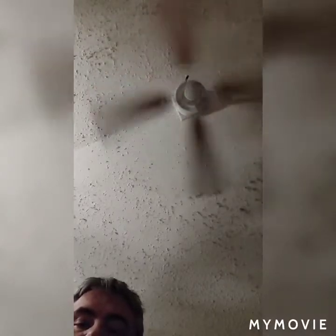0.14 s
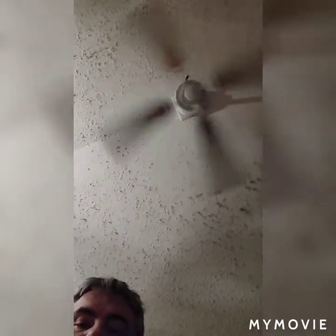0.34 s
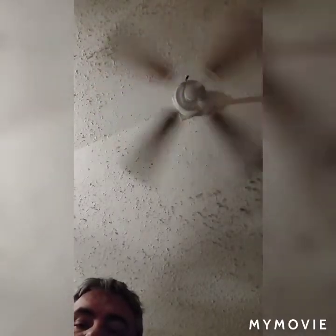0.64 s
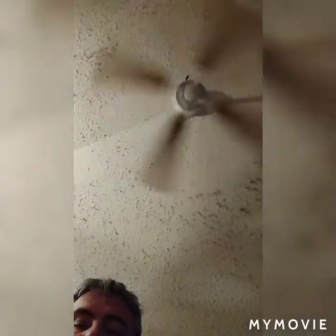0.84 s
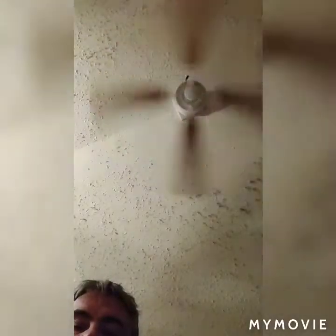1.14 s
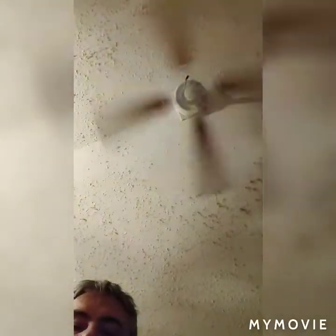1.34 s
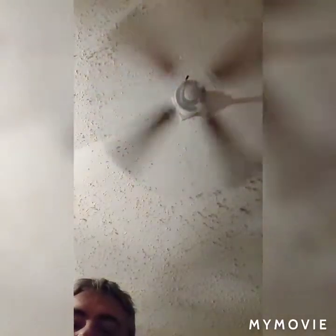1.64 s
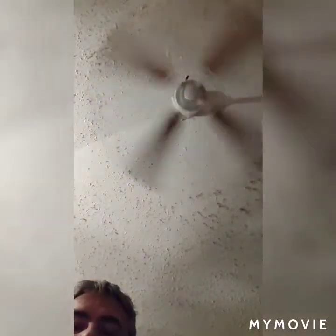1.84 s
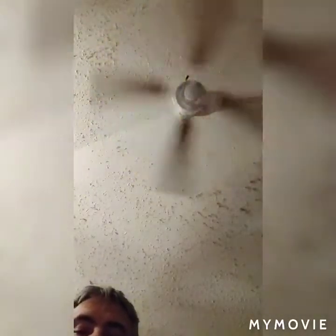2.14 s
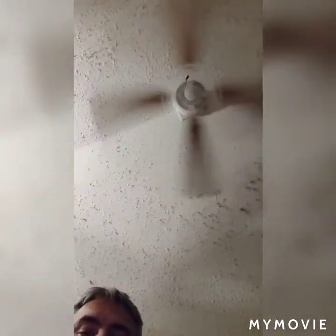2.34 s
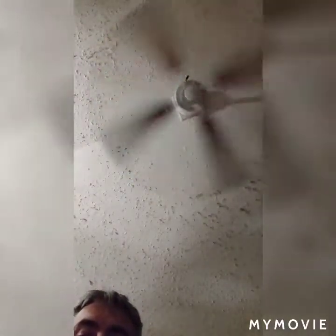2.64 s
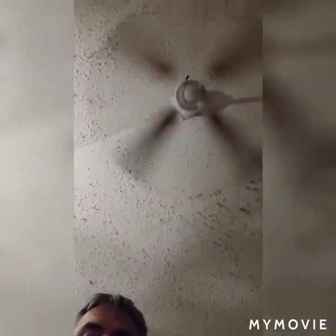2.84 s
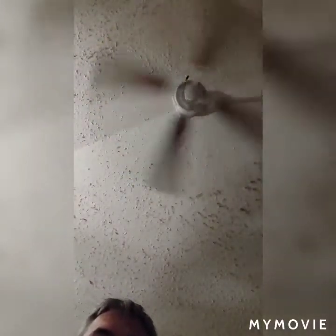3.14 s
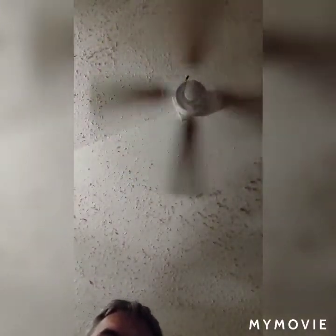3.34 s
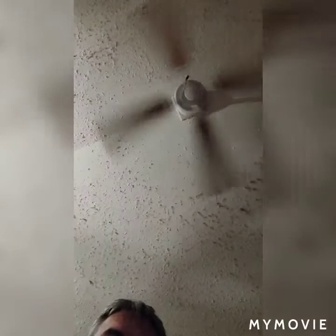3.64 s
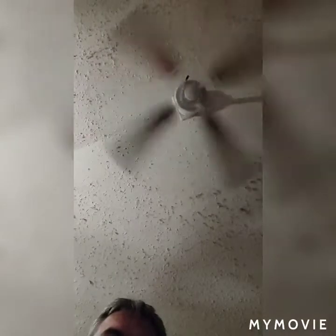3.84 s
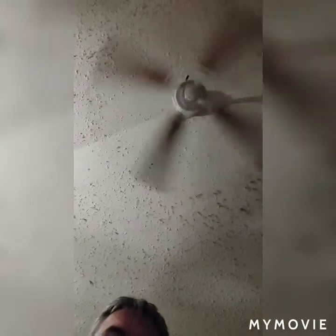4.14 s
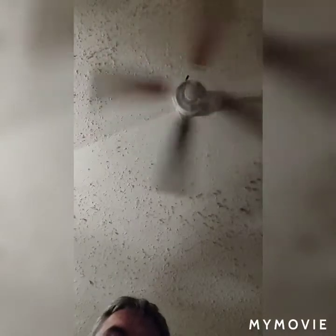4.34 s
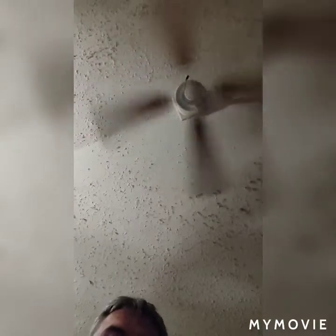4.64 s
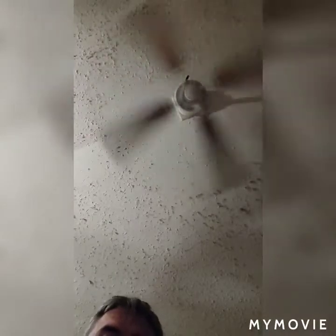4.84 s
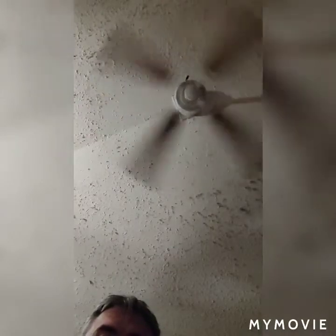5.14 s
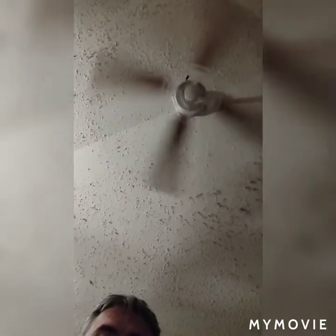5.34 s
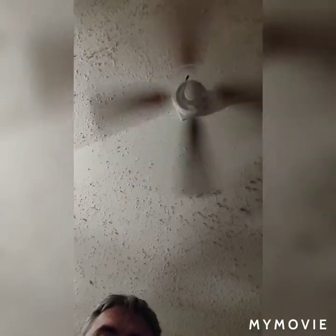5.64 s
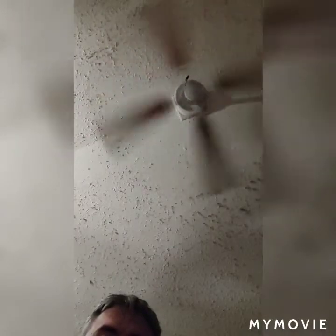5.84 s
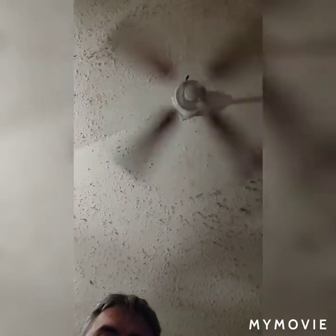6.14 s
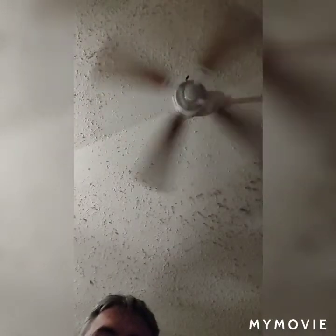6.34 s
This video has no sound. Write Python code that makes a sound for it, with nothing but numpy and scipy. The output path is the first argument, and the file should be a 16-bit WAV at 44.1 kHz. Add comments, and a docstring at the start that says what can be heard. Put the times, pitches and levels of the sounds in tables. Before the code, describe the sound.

Close, dry crinkling of a crisp plastic pack being squeezed and torn by hand. Sharp clicks with tiny short rings mix with finer clumped crackle, doubled by a hard surface nearby. A few damped thumps and buzzes come from a table, strongest near two seconds. The first half is patchy, the second nearly continuous and brighter. Small indoor room, faint fan air far below.

```python
"""Stiff clear plastic packaging is squeezed and torn by hand close to a microphone in a small room.
Snaps are gritty noise bursts with a short ring; between them smaller folds crackle as clumped noise puffs.
A hard surface nearby returns both a few milliseconds later. Now and then the pack knocks on a table:
a damped low swing with rattle and buzz. A fan murmur of shaped noise lies far below."""
import sys
import numpy as np
from scipy import signal
from scipy.fft import rfft, irfft
from scipy.io import wavfile
from scipy.ndimage import uniform_filter1d

SR = 44100
rng = np.random.default_rng(int(sys.argv[2]) if len(sys.argv) > 2 else 0)


def inscribe(sig):
    """Save sig as 16-bit PCM at rate SR to the path in sys.argv[1].

    A 1-D sig is mono; a 2-D sig holds one channel per row.
    Samples are clipped to [-1, 1] before scaling.
    """
    pcm = np.round(np.clip(np.atleast_2d(sig).T, -1, 1) * 32767)
    wavfile.write(sys.argv[1], SR, pcm.astype(np.int16))


def volts_from_db(level):
    """Convert decibel levels to linear amplitude ratios."""
    exponent = np.asarray(level, float) / 20
    return 10 ** exponent


N = 285768

# loud creases: (time [s], level [dB], brightness [dB/octave], ring [Hz], relative ring level [dB])
CREASES = [(0.0257, -22, 4, 2436, -2), (0.052, -26, 15, 4430, 7.5), (0.132, -33, 4.5, 3060, 0),
           (0.1666, -25.5, 2, 4260, -22), (0.2123, -12.5, 5.5, 786, -22), (0.233, -30, 2, 1530, -15),
           (0.2513, -29.5, 0, 5900, -5), (0.2575, -22.5, 1.0, 6190, 8.5), (0.276, -45.5, 7, 1210, 15),
           (0.3342, -21, 3, 1050, -7), (0.3605, -19.5, 2, 2310, -4), (0.377, -33, -1, 2760, 7),
           (0.415, -37, -3, 2700, 6), (0.4469, -31, 2.5, 4280, -20), (0.5446, -33.5, 1.5, 1427, 8),
           (0.6321, -33, 4.5, 2610, 10), (0.652, -37.5, 6, 2750, -13), (0.6676, -36.5, -1.5, 2580, 6.5),
           (0.703, -42.5, -2, 1420, 8), (0.719, -32, 3.5, 1500, 3), (0.74, -34, 0, 1810, 4),
           (0.78, -38.5, -5, 1556, 2), (0.878, -33, 1, 3480, -8), (0.9019, -24, 0.5, 1060, -16),
           (0.942, -27, -1, 5740, 8), (1.043, -27.5, 5, 1500, -16), (1.0564, -29.5, 5, 1500, 4.5),
           (1.1106, -19, 22, 3040, -3.5), (1.117, -21, 4.5, 2630, -16), (1.1414, -22.5, 1, 2434, 1),
           (1.2609, -25.5, -1, 1620, -5), (1.2651, -16, 5.5, 1610, -6), (1.301, -30, 5, 2130, -5),
           (1.3262, -38, 3.5, 1000, -6), (1.3738, -28.5, 6.5, 3700, -22), (1.4345, -40.5, 14.5, 3600, -19),
           (1.523, -37, -0.5, 1290, -1.5), (1.625, -64, -9, 1050, 14), (1.656, -48.5, 7, 2500, 0),
           (1.688, -33.5, 4.5, 3510, 8), (1.6947, -28, 3, 4175, 9.5), (1.7133, -24, 2.5, 4300, 4),
           (1.768, -53.5, -1, 2830, 20), (1.7888, -27.5, 2.5, 1080, -7), (1.806, -35, 5, 1520, -4),
           (1.992, -39, -8, 1090, 1), (2.0036, -32, -3.5, 1090, 3), (2.0158, -32, 0.5, 2610, 9),
           (2.065, -31.5, -11, 2560, 3.5), (2.08, -27, -14, 1310, -22), (2.0929, -36.5, -1.5, 3870, -3),
           (2.122, -27.5, -2.5, 2450, -2), (2.165, -12.5, 3.5, 2490, 5), (2.356, -55, -7, 2760, 16.5),
           (2.37, -33.5, 1, 1885, 6.5), (2.439, -44.5, 2.5, 1680, 5), (2.6112, -44, -5, 2490, 15),
           (2.6483, -27, 2.5, 2710, 0), (2.6694, -23, 5.5, 1900, -6), (2.6946, -47, 5, 2680, 14),
           (2.725, -32, 3.5, 4300, -11), (2.7398, -40, 2.5, 3910, 11), (2.9375, -53, 1, 2780, 21),
           (2.9603, -34, 6, 1950, 6.5), (2.9807, -31.5, 3.5, 2700, 10), (3.005, -27, 5, 2530, -11),
           (3.037, -28.5, 7.5, 2570, 0), (3.0745, -18, 4, 1080, -13), (3.0996, -21.5, 6, 2460, -1.5),
           (3.1811, -42, 6, 1130, 7.5), (3.208, -36, 0, 3570, -1), (3.2142, -41, -8, 1110, 7),
           (3.2301, -34.5, -8, 2670, -24), (3.2581, -32, 0, 840, -1.5), (3.2856, -30.5, 5, 5600, -7),
           (3.301, -35, 2.5, 850, 1), (3.352, -41, -14, 1030, 4), (3.369, -28, 2, 1700, 2),
           (3.3908, -23, 8, 1240, -6), (3.449, -16, 4, 4724, 1.5), (3.476, -41.5, 8, 900, 3.5),
           (3.5605, -30, 2.5, 2640, -4), (3.578, -34, 5, 2850, 6), (3.6125, -38, 0, 2950, 9),
           (3.656, -23, 4, 2437, 2.5), (3.697, -27, 3, 5970, -10), (3.733, -38.5, -5, 5840, 9),
           (3.749, -34.5, 10, 920, -1), (3.777, -24.5, 12, 1100, -10), (3.798, -25.5, -5.5, 1060, -11.5),
           (3.815, -20, 4.5, 6200, -12), (3.831, -34.5, -1, 2730, -3), (3.8602, -22.5, 15, 6050, 0),
           (3.886, -24.5, 6, 5260, 3), (3.936, -24, 5, 5930, -8), (3.9723, -20.5, 10.5, 1080, -11),
           (3.98, -29.5, -5.5, 1080, 5), (3.9942, -22, 5.5, 814, -9.5), (4.011, -28, 10.5, 6100, -13),
           (4.0719, -28.5, 2, 3550, -7), (4.0889, -40, 2, 1630, 8.5), (4.1552, -35.5, 7, 5970, -7),
           (4.175, -35, 3.5, 3020, -6), (4.181, -30, 5.5, 3700, 5.5), (4.2175, -36, 2.5, 1790, 1),
           (4.2381, -49.5, -3, 1080, 12), (4.2657, -28.5, 4, 830, -7), (4.2864, -28.5, 3.5, 3830, -5),
           (4.3125, -26.5, 5, 850, -10), (4.43, -37, 10, 6200, 2), (4.4571, -30, 3, 2980, 4),
           (4.466, -38, 7, 3470, 10), (4.543, -41, 4, 1410, 2), (4.585, -28, 5, 3230, 5),
           (4.623, -33, -3, 2800, 5.5), (4.641, -28, 1.5, 3110, -1), (4.688, -27, 0.5, 5900, -5),
           (4.697, -22.5, 20, 5610, 5.5), (4.731, -22.5, 2, 4320, -3), (4.753, -30, 9, 3770, 7),
           (4.7783, -18, 0.7, 2760, -4), (4.812, -26, 5, 3850, 4.5), (4.8416, -36.5, 0, 3950, 7),
           (4.8616, -25.5, 5.5, 3850, -1), (4.883, -28, 3, 2820, -15), (4.9027, -26, 4, 2790, 0),
           (4.9392, -25.5, 4, 2710, -4), (4.972, -28, 2.5, 1040, -4.5), (4.9924, -27.5, 6, 1180, -10.5),
           (5.026, -24.5, 7.5, 950, -11), (5.1038, -22.5, 3, 4480, 3), (5.117, -26.5, 6, 3870, -11),
           (5.1934, -26.5, 4, 4140, 1), (5.236, -33.5, -8, 1740, 8), (5.2521, -29, 3.5, 3850, -14),
           (5.2796, -36.5, 2, 1120, 2.5), (5.3008, -22, 6.5, 3920, -4), (5.3345, -22.5, 3, 3870, -4),
           (5.371, -18.5, 8, 3980, 2.5), (5.384, -15, 7.5, 2720, -8), (5.413, -31, -6, 1470, 9),
           (5.4536, -25.5, 0.5, 3280, -6), (5.4875, -20, 3.5, 3900, 6.5), (5.5081, -19, -1.5, 3040, -5),
           (5.5536, -22, 2.5, 4270, -19), (5.617, -33.5, 3, 2940, -1), (5.656, -14.5, 3.5, 3580, 2),
           (5.746, -23.5, 4, 5600, -8), (5.793, -34, 10, 4240, -9), (5.8062, -27.5, 4, 3850, -19),
           (5.8712, -44.5, 0, 4130, -4), (5.926, -43.5, 7, 1180, 3.5), (5.9913, -25.5, 2, 1490, 1),
           (6.009, -24, -1, 2820, -17), (6.021, -38.5, -4, 1070, 4), (6.077, -27.5, 2, 3280, 5),
           (6.103, -43.5, 3, 1320, 6), (6.1461, -25, 0.5, 1514, 3.5), (6.183, -53, -1, 1510, 15),
           (6.213, -20.5, 3, 4170, -14), (6.2534, -20, 2.5, 3780, 3), (6.3587, -19.5, 6.5, 6270, -5),
           (6.396, -28.5, 4.5, 5950, -2), (6.4271, -27, 7.5, 3780, -11), (6.442, -28.5, 2.5, 2940, -8)]
# pack against table: (time [s], peak level [dB], pitch [Hz], t60 [s])
TABLE_KNOCKS = [(0.961, -25, 263, 0.077), (1.262, -23.5, 385, 0.018), (1.5273, -29.5, 175, 0.038),
                (1.5518, -28, 195, 0.03), (1.71, -44, 268, 0.041), (1.966, -42.5, 192, 0.11),
                (2.006, -12, 194, 0.048), (2.06, -34, 233, 0.092), (2.121, -30, 365, 0.079),
                (2.168, -17, 371, 0.1), (2.187, -18, 277.5, 0.099), (2.2, -32.5, 154, 0.15),
                (2.223, -26.5, 332, 0.12), (3.447, -19, 274, 0.0079), (5.512, -25, 384, 0.04),
                (5.656, -13, 454, 0.02), (6.012, -36.5, 643, 0.057), (6.255, -18.5, 378, 0.015)]
# table buzz after a knock: (frequency [Hz], width [Hz], relative level [dB])
TABLE_BUZZ = [(538, 50, 7.5), (815, 260, 5.5), (1370, 60, -4.5), (2593, 40, 0.5), (3490, 60, -4.5),
              (4320, 66, -10.5)]
# resonances of pack and table: (frequency [Hz], width [Hz], gain [dB])
PACK_RESONANCES = [(850, 130, -4.5), (1080, 300, 0), (1450, 410, -7), (2744, 380, -5.5), (3870, 470, -6.5),
                   (9700, 320, -12), (11720, 840, -4)]
# microphone response: (frequency [Hz], gain [dB])
MICROPHONE = [(30, -33), (80, -6.5), (160, -5), (400, -7.5), (1000, -11.5), (2000, -8), (2600, -6.5),
              (6000, -5), (8600, -5.5), (11800, -5), (12800, -15.5), (15800, -18), (16600, -69)]
# spectrum of fan murmur and faint steady hiss: (frequency [Hz], relative density [dB])
AIR_SPECTRUM = [(24, -41.5), (40, -11.5), (137, -12), (269, 4), (402, -6.5), (1760, -28), (4000, -23),
                (5580, -29.5), (11400, -22), (16000, -50.5)]
# hands squeezing the pack: (start [s], length [s], crackle level [dB], relative body of the rustle [dB])
HAND_SQUEEZES = [(0, 0.056, -52.5, -31), (0.127, .07, -56.5, -9), (0.19, 0.051, -55, -8),
                 (0.315, 0.16, -54.5, -18), (0.656, 0.11, -54.5, 0.5), (0.885, 0.083, -40, -4),
                 (0.924, 0.054, -38.5, -3.5), (0.985, 0.066, -49.5, -6.5), (1.109, 0.042, -52.5, -15),
                 (1.249, 0.025, -55.5, -6), (1.682, 0.021, -49, -6), (1.735, 0.06, -67, 6.5),
                 (1.953, 0.027, -65, -13), (1.99, 0.014, -45.5, -5), (2.08, 0.081, -59.5, -12),
                 (2.167, 0.043, -46, 6.5), (2.599, 0.1, -54.5, -4), (2.891, 0.062, -60, -6),
                 (2.911, 0.11, -51.5, -2.5), (3.057, 0.064, -43, -5), (3.209, 0.029, -42.5, -3.5),
                 (3.297, 0.0075, -51.5, -9), (3.368, 0.099, -39.5, -15), (3.523, 0.17, -51, -10),
                 (3.686, 0.15, -44, -8), (3.76, 0.074, -40.5, -3.5), (3.926, 0.15, -45.5, -5),
                 (4.15, 0.062, -56, -4.5), (4.259, 0.024, -47, -1.5), (4.415, 0.036, -43.5, -11.5),
                 (4.505, 0.042, -52, -6), (4.564, 0.031, -40, -7.5), (4.667, 0.02, -38.5, -8),
                 (4.711, 0.05, -37, -5.5), (4.76, 0.32, -51, -3.5), (5.11, 0.16, -40, -8.5),
                 (5.328, 0.13, -36, -1), (5.449, 0.13, -47, 0.5), (5.637, 0.065, -41.5, -9),
                 (5.746, 0.25, -55, -15), (5.968, 0.064, -50, -14), (6.07, 0.056, -56, -4),
                 (6.16, 0.045, -56, -3), (6.222, 0.035, -48, -21), (6.259, 0.033, -49.5, -6),
                 (6.338, 0.11, -55.5, -24)]

ECHO_DELAY_S = 0.0037   # path by way of the near surface


def rms_one(x):
    """Scales to rms 1."""
    return x / np.sqrt(np.mean(x ** 2) + 1e-20)


def shaped(x, points):
    """Filters by gains in dB, joined on a log-frequency axis."""
    hz, db = np.transpose(points)
    bins_hz = np.arange(1, len(x) // 2 + 2) * SR / len(x)
    gain_db = np.interp(np.log(bins_hz), np.log(hz), db)
    return irfft(rfft(x) * volts_from_db(gain_db), len(x))


def band(x, low_hz, high_hz):
    """Band-pass."""
    return signal.sosfilt(signal.butter(2, [low_hz, high_hz], "band", fs=SR, output="sos"), x)


def drift(rate_hz):
    """Slow random curve of rms 1: twice low-passed noise, drawn every 40 samples."""
    r = np.exp(-80 * np.pi * rate_hz / SR)
    noise = rng.standard_normal(N // 40 + 2002)
    slow = signal.lfilter([1], [1, -2 * r, r * r], noise)[2000:]   # start-up dropped
    return np.interp(np.arange(N) / 40, np.arange(len(slow)), rms_one(slow))


def resonance(x, hz, width_hz):
    """Two-pole resonance with a peak gain of about 1."""
    r = np.exp(-np.pi * width_hz / SR)
    poles = [1, -2 * r * np.cos(2 * np.pi * hz / SR), r * r]
    return signal.lfilter([(1 - r * r) / 2, 0, (r * r - 1) / 2], poles, x)


def laid_out(bursts, times_s):
    """Adds each row at its moment."""
    out = np.zeros(N + bursts.shape[1])
    for burst, s in zip(bursts, times_s):
        start = int(s * SR)
        out[start:start + len(burst)] += burst
    return out[:N]


def fan_and_hiss(level_db=-72.5):
    """Fan murmur and faint hiss: shaped noise whose level wavers slowly."""
    waver_db = 1.5 * drift(5)
    return volts_from_db(level_db + waver_db) * rms_one(shaped(rng.standard_normal(N), AIR_SPECTRUM))


def room(x, t60_s=0.19, wall_cut_hz=11100):
    """Dense reflections after 7 ms; sound outside 60 Hz to the wall cut dies twice as fast."""
    t = np.arange(SR // 2) / SR
    noise = rng.standard_normal(len(t)) * (t > 0.007)
    dull = band(noise, 60, wall_cut_hz)
    tail = dull * volts_from_db(-60 * t / t60_s) + (noise - dull) * volts_from_db(-120 * t / t60_s)
    return signal.fftconvolve(x, tail / np.linalg.norm(tail))[:N]


def near_surface(x, echo_db=4, scatter_s=0.00092):
    """Adds one strong reflection, spread over a millisecond or two by the uneven surface."""
    spread = rng.standard_normal(256) * np.exp(-np.arange(256) / (scatter_s * SR))
    spectrum = rfft(spread)
    even = irfft(spectrum / np.abs(spectrum))   # smeared in time, no pitch favoured
    late = np.concatenate([np.zeros(int(ECHO_DELAY_S * SR)), even])
    return x + volts_from_db(echo_db) * signal.fftconvolve(x, late)[:N]


def knocks(rattle_gain=0.36, wobble_rad=0.03, damping_power=1.245, rise_cycles=0.9, buzz_db=-14,
           soft_rise_s=0.005):
    """A dull push swings the table top and the air in the pack; the hands damp the swing ever faster.
    Deep knocks rattle less; soft ones swell slowly and stay clean."""
    s, peak_db, hz, t60_s = np.transpose(TABLE_KNOCKS)[:, :, None]
    t = np.arange(8192) / SR
    size = (len(s), len(t))
    hardness = np.minimum(volts_from_db(peak_db + 25.5), 1)
    rattle = rattle_gain * (hz / 320) ** 2 * rms_one(band(rng.standard_normal(size), 160, 520))
    shake = rng.standard_normal(size)
    buzz = sum(volts_from_db(db) * rms_one(resonance(shake, top_hz, width_hz)) for top_hz, width_hz, db in TABLE_BUZZ)
    # the pack shifts, so the swing loses step
    wander_rad = wobble_rad * np.cumsum(rng.standard_normal(size), axis=1)
    swing = np.sin(2 * np.pi * hz * t + hardness * wander_rad)
    swing = swing + hardness * (rattle + volts_from_db(buzz_db) * buzz)
    fade = volts_from_db(peak_db - 60 * (t / np.clip(t60_s, 0.01, 0.4)) ** damping_power)
    rise = 1 - np.exp(-t / (rise_cycles / hz + soft_rise_s * (1 - hardness)))
    return laid_out(fade * swing * rise, s[:, 0])


def hands(grip_db_per_s=891.5, let_go_db_per_s=309.5, rest_db=-78.5, rest_body_db=2):
    """Squeezes swell, hold and die away over a film never quite still; gives crackle and body levels in dB."""
    t = 40 * np.arange(N // 40 + 2) / SR
    power, body = volts_from_db(2 * rest_db), volts_from_db(2 * (rest_db + rest_body_db))
    for s, length_s, db, body_db in HAND_SQUEEZES:
        swell_db = grip_db_per_s * np.maximum(s - t, 0)
        fade_db = let_go_db_per_s * np.maximum(t - s - length_s, 0)
        part = volts_from_db(2 * (db - swell_db - fade_db))
        power, body = power + part, body + part * volts_from_db(2 * body_db)
    times_s = np.arange(N) / SR
    return [np.interp(times_s, t, 10 * np.log10(p)) for p in (power, body / power)]


def crackle(level_db, body_db, per_s=400, spread_db=2.5, clump_db=3.5, grain_s=0.00053, hiss_db=-15,
            tilt_db_per_band=2.1, brightening_db_per_db=0.25):
    """Small folds give clumped puffs, each pitched by the size of the film patch it shakes.
    Broad, loosely held faces of the pack add a lower body to the rustle."""
    sizes = volts_from_db(spread_db * np.minimum(rng.exponential(1, N), 2.6))
    clumps = volts_from_db(clump_db * drift(30))   # also scales the rate per_s
    starts = sizes * (rng.random(N) < per_s * clumps / SR) + 1e-18
    patch = rng.integers(-1, 12, N)
    r, noise = np.exp(-1 / (grain_s * SR)), rng.standard_normal(N)
    grains = 0
    for k, hz in enumerate(np.geomspace(400, 11000, 11)):
        near = starts * (np.abs(patch - k) < 2)   # a patch also drives the neighbouring bands
        puffs = noise * signal.lfilter([1], [1, -2 * r, r * r], near)
        grains = grains + (-1) ** k * volts_from_db(tilt_db_per_band * k) * band(puffs, hz / 1.74, hz * 1.34)
    # film sliding on film
    slide = shaped(clumps * rng.standard_normal(N), [(100, 5.0), (1000, 1.5), (12000, -6)])
    rustle = rms_one(grains) + volts_from_db(hiss_db) * rms_one(slide)
    edges_hz = [(550, 1900), (1900, 5000), (5000, 17000)]
    body, middle, top = [rms_one(band(rustle, low, high)) for low, high in edges_hz]
    top_db = brightening_db_per_db * (level_db + 54.5)   # harder handling is brighter
    # alternate signs join the bands without holes
    return volts_from_db(level_db) * (volts_from_db(body_db) * body - 0.58 * middle + 0.52 * volts_from_db(top_db) * top)


def snaps(length_s=0.007, crack_db=5, crack_s=0.0017, grit_db=4.5, rise_s=0.00022, creep_db=-11,
          creep_s=0.0035, tail_db=-30, tail_s=0.12, thump_db=-12, lowest_db=-3, flat_tilt_db=1.5,
          ring_cycles=13, after_db=-18, after_s=0.051, direct_ring_db=6, echo_ring_db=7, echo_bass_db=5,
          echo_db=0.5, scatter_share=0.96):
    """A crease flips: a brief creep, a gritty burst, dull or bright, and the short ring of the patch beside it.
    The near surface returns it all, scattered."""
    s, level_db, tilt_db, ring_hz, ring_db = np.transpose(CREASES)[:, :, None]
    lead_s = np.arange(-256, 1792) / SR   # time from the flip
    t = np.maximum(lead_s, 0)
    draws = rng.standard_normal((len(s), 4, 2048))
    chance = draws[:, 3]   # one row of chances per snap

    length = length_s * np.exp(0.3 * chance[:, :1])
    rise = 1 - np.exp(-t / rise_s)
    main = volts_from_db(-30 * (t / length) ** 0.98)
    crack = volts_from_db(crack_db - 30 * t / crack_s)
    tail = volts_from_db(tail_db - 60 * t / tail_s)
    creep = volts_from_db(creep_db - 20 * np.abs(lead_s) / creep_s)
    shape = (main + crack + tail) * rise + creep

    edges_hz = 130 * 2 ** np.array([0, 1.5, 2.6, 3.5, 4.3, 5, 5.6, 6.2, 7])
    centres_hz = np.sqrt(edges_hz[:-1] * edges_hz[1:])
    octaves = np.log2(np.clip(centres_hz, 700, 9000) / 2600)
    share_db = [(tilt_db - flat_tilt_db) * octave for octave in octaves]
    share_db[0], share_db[1] = share_db[0] + thump_db, share_db[1] + lowest_db

    # the ring lingers unevenly
    sway = signal.lfilter([0.08], [1, -0.92], rng.standard_normal((len(s), 2048)))
    fade = volts_from_db(-60 * t * ring_hz / ring_cycles) + volts_from_db(after_db - 60 * t / after_s) * rms_one(sway)
    ring = volts_from_db(ring_db) * fade * np.sin(2 * np.pi * ring_hz * t) * rise

    def coloured(noise, patch_db, ring_gain_db, bass_db):
        """Every fold shakes another patch of film, so its bands differ a little by chance."""
        burst = noise * volts_from_db(grit_db * draws[:, 2]) * shape
        patch_db = patch_db + bass_db * (np.arange(8) < 2)
        out = 0
        for k in range(8):
            part = band(burst, edges_hz[k], edges_hz[k + 1])
            part = part / np.linalg.norm(part, axis=1, keepdims=True)
            out = out + (-1) ** k * volts_from_db(share_db[k] + patch_db[:, k, None]) * part
        loudest = np.sqrt(uniform_filter1d(out ** 2, size=60).max(axis=1, keepdims=True))
        return out / loudest + volts_from_db(ring_gain_db) * ring

    direct = coloured(draws[:, 0], 2.5 * chance[:, 1:9], direct_ring_db, -echo_bass_db)
    scattered = np.sqrt(1 - scatter_share) * draws[:, 0] + np.sqrt(scatter_share) * draws[:, 1]
    echo = coloured(scattered, 2.5 * chance[:, 9:17], echo_ring_db, echo_bass_db)
    # the film turns between folds, so the reflection varies
    each_echo_db = echo_db + 2.2 * chance[:, 17:18]
    start_s = s[:, 0] + lead_s[0]
    first = laid_out(volts_from_db(level_db) * direct, start_s)
    return first + laid_out(volts_from_db(level_db + each_echo_db) * echo, start_s + ECHO_DELAY_S)


def scene():
    """Film and knocks in the room, through the microphone, over the fan."""
    film = snaps() + near_surface(crackle(*hands()))
    film = film + sum(volts_from_db(db) * resonance(film, hz, width_hz) for hz, width_hz, db in PACK_RESONANCES)
    pack = film + knocks()
    in_room = pack + volts_from_db(-17) * room(pack)
    return (shaped(in_room, MICROPHONE) + fan_and_hiss())[None]


def top_cut(x):
    """Nothing passes above the cut-off."""
    return signal.sosfilt(signal.butter(12, 16970, fs=SR, output="sos"), x)


def record(dry):
    """The highest peaks are rounded off below a ceiling."""
    ceiling = 0.45
    mix = ceiling * np.tanh(dry / ceiling)
    return top_cut(mix)


dry = scene()
out = record(dry)
inscribe(out)
```